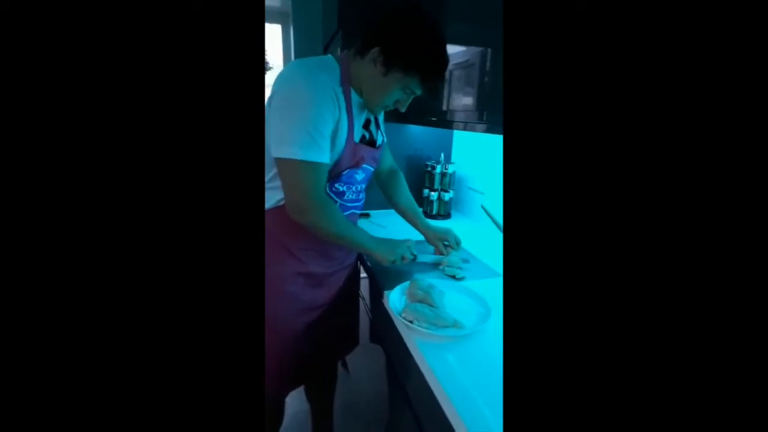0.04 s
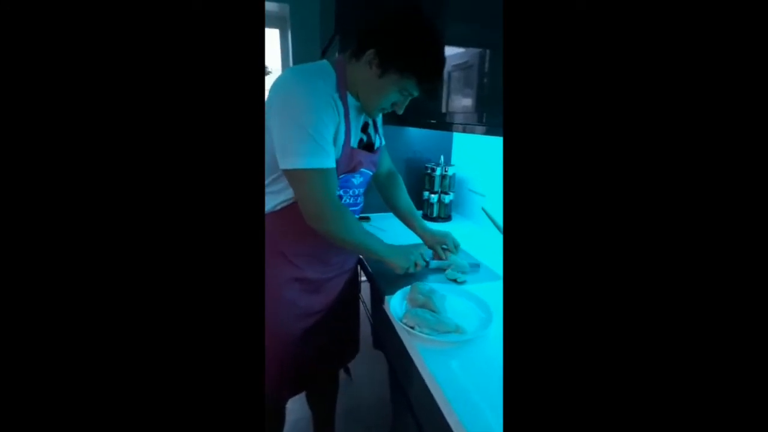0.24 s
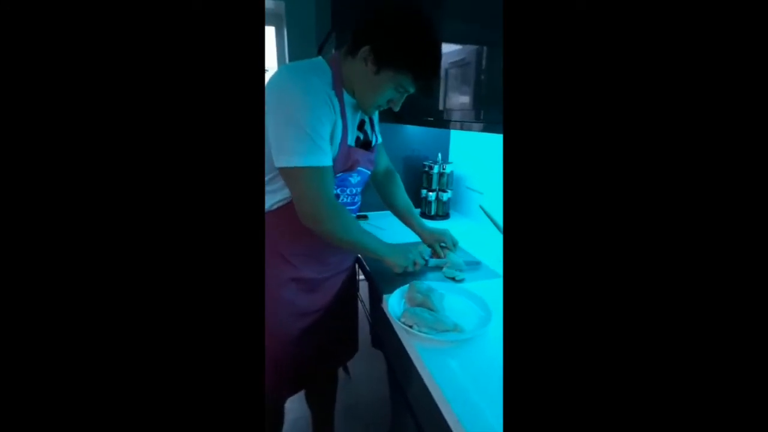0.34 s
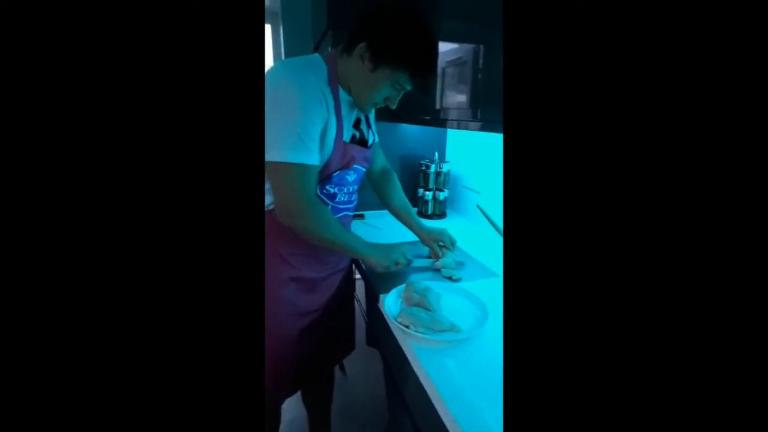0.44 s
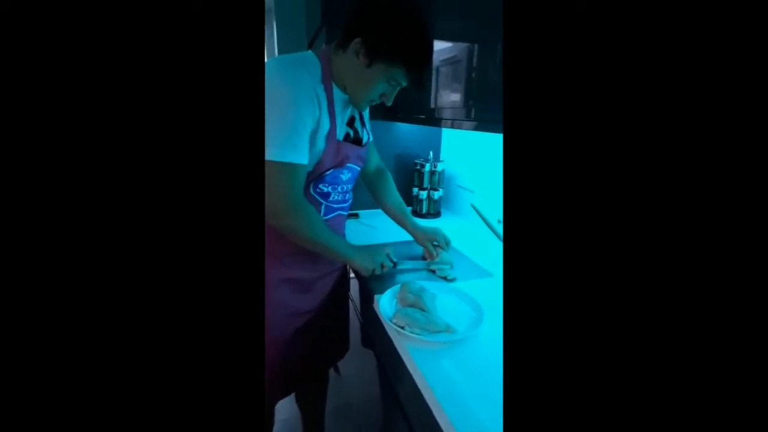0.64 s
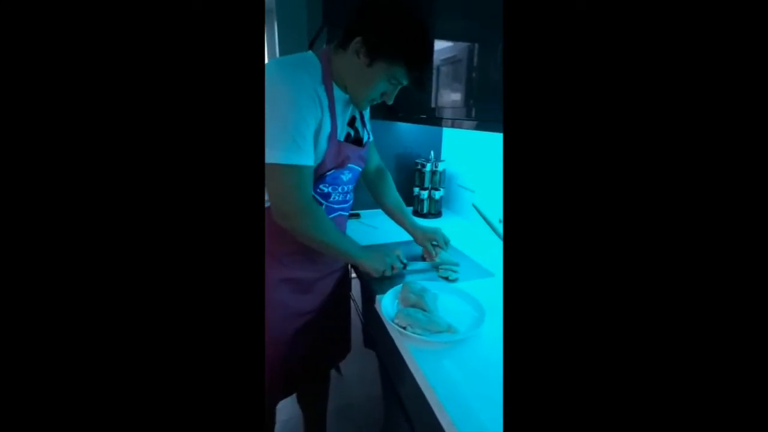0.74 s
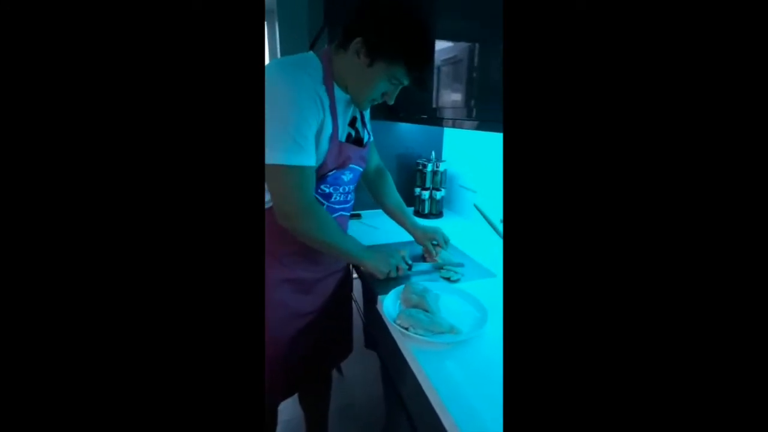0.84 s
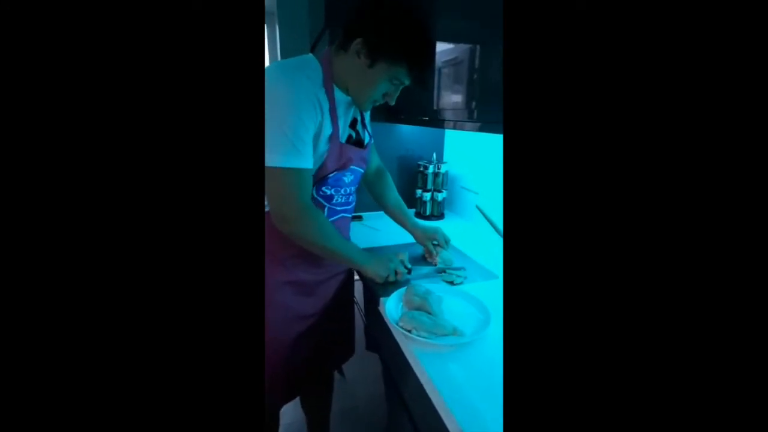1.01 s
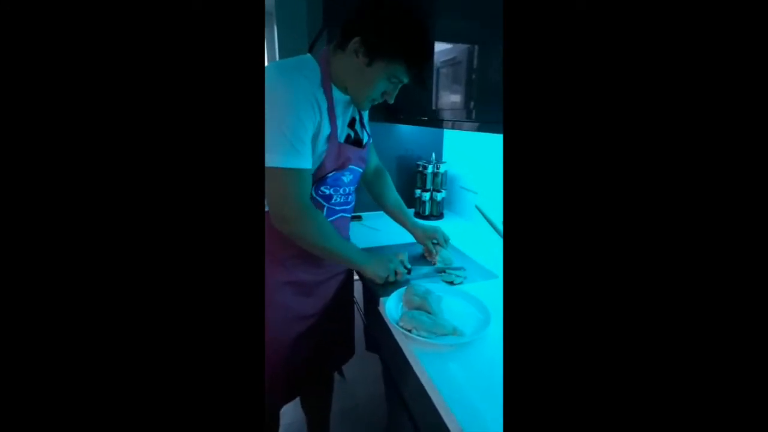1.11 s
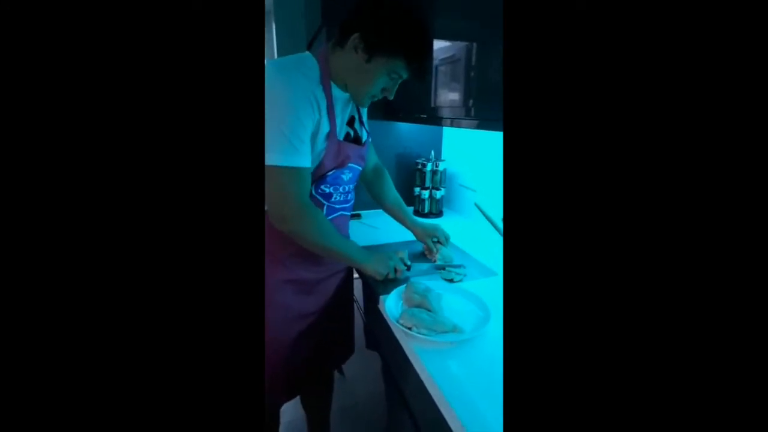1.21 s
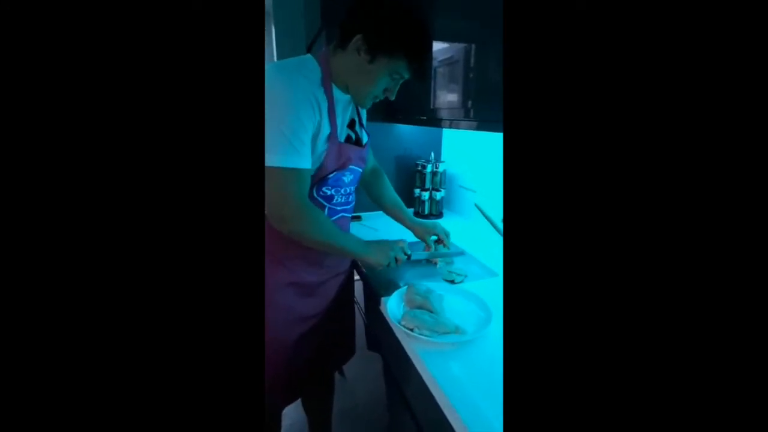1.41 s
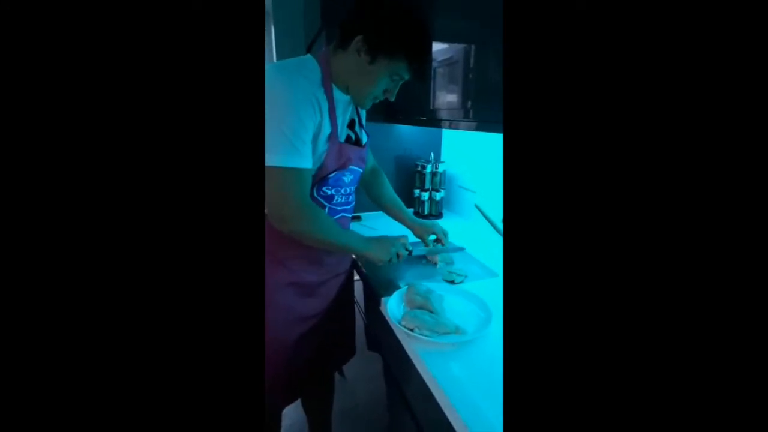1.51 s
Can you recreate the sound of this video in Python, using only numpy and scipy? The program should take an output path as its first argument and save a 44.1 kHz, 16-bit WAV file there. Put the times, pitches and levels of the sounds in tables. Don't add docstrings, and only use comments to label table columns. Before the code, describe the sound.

A knife cuts raw meat on a chopping board. An earlier blow's echo fades over low fridge hum; at 0.2 s comes a sharp knock with a dull worktop thud. Quieter sawing runs 0.34-0.55, a tiny squeak near 0.6, rough slicing chatter 0.66-0.8, a bright hard scrape 0.94-1.0, and a soft push around 1.15. Hard kitchen reverberation, then room tone with a very faint thin whine from 1.3.

```python
import sys
import numpy as np
from scipy import signal
from scipy.fft import rfft, irfft, next_fast_len
from scipy.io import wavfile
from scipy.ndimage import map_coordinates

SR = 44100
rng = np.random.default_rng(int(sys.argv[2]) if len(sys.argv) > 2 else 0)


def to_wav(sig):
    pcm = np.clip(np.atleast_2d(sig), -1, 1) * 32767
    pcm = np.round(pcm).astype(np.int16)
    wavfile.write(sys.argv[1], SR, pcm.T)


def boost(x):
    u = np.asarray(x, float) / 20
    return 10 ** u


N = 68355
TIME = np.arange(N) / SR
SPOTS = 3


def unit(x):
    return x / np.sqrt(np.mean(x ** 2) + 1e-20)


def along(points, hz):
    f, value = np.transpose(points)
    return np.interp(np.log(hz + 1), np.log(f + 1), value)


def wobble(rate):
    knots = rng.standard_normal(int(N * rate / SR) + 4)
    return map_coordinates(knots, [np.arange(N) * rate / SR])


def filtered(x, response):
    size = 2 * next_fast_len(N // 2 + SR // 4)
    hz = np.fft.rfftfreq(size, 1 / SR)
    return irfft(rfft(x, size) * response(hz), size)[..., :N]


def causal(gain):
    cepstrum = irfft(np.log(gain + 1e-6))
    half = len(cepstrum) // 2
    cepstrum[1:half] *= 2
    cepstrum[half + 1:] = 0
    return np.exp(rfft(cepstrum))


def paired(pair, spectrum):
    # f/Hz, correlation
    alike = [(60, 0.7), (250, 0.94), (600, 0.29), (2000, 0.14), (10000, .05)]

    def mid_and_side(hz):
        turn = np.arccos(np.clip(along(alike, hz), -1, 1)) / 2
        return boost(along(spectrum, hz)) * [np.cos(turn), np.sin(turn)]

    mid, side = filtered(pair, mid_and_side)
    return np.array([mid + side, mid - side])


def rush(spectrum):
    return unit(paired(rng.standard_normal((2, N)), spectrum))


def background():
    # f/Hz, level/dB rms, left over right/dB
    fridge = [
        (166.9, -65.5, -3.5),
        (409.8, -67, -0.5),
    ]
    # f/Hz, level/dB per Hz
    air_colour = [(25, -34.5), (100, -11.5), (170, -13), (450, -14), (1000, -28.5), (3000, -45),
                  (7300, -38.5), (11000, -35.5)]
    # t/s, level/dB
    air_drift = [(1.2, -2), (1.34, -1)]
    # f/Hz, level/dB per Hz
    echo_colour = [(88, -32), (150, -7.5), (600, -6.5), (1190, -17.5), (2350, -17.5), (3830, -24),
                   (7300, -25), (15900, -25.5)]
    # t/s, level/dB
    echo_fade = [(0, -1.5), (.06, -4), (.11, -11.5), (.14, -14.5), (.17, -12.5), (.2, -6), (.3, -32)]
    tones = 0
    for hz, db, pan_db in fridge:
        level_db = db + 0.5 + 1.8 * wobble(12) + pan_db * np.array([[.5], [-.5]])
        phase = 2 * np.pi * hz * TIME + .35 * wobble(6)
        tones = tones + boost(level_db) * np.sin(phase)
    air_db = -60.5 + np.interp(TIME, *np.transpose(air_drift)) + 1.2 * wobble(9.26)
    echo_db = -48 + np.interp(TIME, *np.transpose(echo_fade), right=-120)
    return boost(air_db) * rush(air_colour) + tones + boost(echo_db) * rush(echo_colour)


def worktop():
    # t/s, level/dB, f/Hz, t60/s
    thuds = [
        (-.012, -41.5, 98, 0.21),
        (.1865, -30.5, 93, 0.2),
        (0.199, -41, 122, 0.2),
        (0.376, -54.5, 100, 0.45),
    ]
    out = np.zeros(N)
    for start, db, hz, t60 in thuds:
        t = np.maximum(TIME - start, 0)
        rise = 1 - np.exp(-t / 0.022)
        out += boost(db - 60 * t / t60) * rise * np.sin(2 * np.pi * hz * t)
    return out * boost(0.74 * wobble(32))


def kitchen(x):
    # f/Hz, t60/s
    decay = [(200, 0.89), (1000, 0.58), (3000, 0.45), (8000, 0.47), (15000, 0.33)]
    hz, t, bins = signal.stft(rng.standard_normal((2, SR // 2)), SR, nperseg=128)
    bins = bins * boost(-60 * t / along(decay, hz)[:, None])
    tail = signal.istft(bins, SR, nperseg=128)[1]
    tail = tail / np.linalg.norm(tail[0])
    delayed = np.pad(x, (40, 0))
    return signal.fftconvolve(delayed[None], tail, axes=1)[:, :N]


def early(spots):
    t = np.arange(SR // 10) / SR
    t60 = 0.07
    tails = rng.standard_normal((SPOTS, 2, len(t))) * boost(-60 * t / t60)
    tails = tails / np.linalg.norm(tails, axis=2, keepdims=True)
    return signal.fftconvolve(spots[:, None], tails, axes=2)[..., :N].sum(0)


def heard(spots, room_db):
    early_db, lag_s = 5.5, 0.00008
    dry = spots.sum(0)
    ears = np.array([[1], [-1]])
    near = filtered(dry, lambda f: np.exp(-1j * np.pi * f * lag_s * ears))
    echoes = boost(early_db) * early(spots) + boost(room_db + 4.5) * kitchen(dry)
    return boost(-9.5) * (near + paired(echoes, [(1, 0.022)]))


def stroke(pressure, blows, colour, rings, grip):
    rate, scatter_db, ring_db, room_db = grip
    draw = rng.random((2, N))
    biggest_slip = .04
    sizes = boost(-scatter_db * np.log(draw[1] + biggest_slip))
    slips = (draw[0] < rate / SR) * sizes * np.sign(rng.standard_normal(N))
    slips = unit(slips) + 0.42 * rng.standard_normal(N)
    s, db = np.transpose(pressure)
    slips = slips * boost(np.interp(TIME, s, db, -120, -120) + 1.2 * wobble(69.93))
    for at, blow_db in blows:
        slips[round(at * SR)] += boost(blow_db)

    def body(f):
        ring = 0
        for centre, width, mode_db in rings:
            peak = boost(2 * (mode_db + ring_db + 9.0))
            ring = ring + peak / (1 + (2.2 * (f - centre) / width) ** 2) ** 2
        power = boost(2 * along(colour, f)) + ring * np.clip(f / 300, 0, 1) ** 2
        return causal(np.sqrt(power / np.mean(power)))

    spots = slips * (rng.integers(SPOTS, size=N) == np.arange(SPOTS)[:, None])
    return heard(filtered(spots, body), room_db)


def blade():
    # t/s, level/dB
    knock = [(0.2085, -66), (0.2093, -22), (0.214, -29), (0.236, -30), (.25, -37.5), (0.292, -37.5),
             (0.311, -67.5)]
    saw = [(0.336, -47.5), (0.347, -38.5), (.39, -38), (0.4, -33), (0.439, -39), (.5, -39), (0.549, -43),
           (0.557, -83.5)]
    slicing = [(0.592, -49.5), (.62, -45), (0.663, -35), (0.664, -27.5), (.69, -28), (.72, -28.5),
               (0.745, -33.5), (.749, -40), (.81, -48), (.83, -55.5)]
    scrape = [(0.925, -58.5), (0.939, -36.5), (0.947, -21.5), (0.955, -21.5), (0.97, -24.5), (0.983, -24.5),
              (0.995, -34), (1.085, -48.5), (1.1, -83)]
    push = [(1.1, -48), (1.143, -49), (1.152, -38), (1.175, -37.5), (1.19, -41.5), (1.199, -44),
            (1.25, -51), (1.301, -76)]
    # t/s, level/dB
    blows = [
        [(0.2098, -2), (.2125, -9), (.2215, -2.5), (.2295, -3.5)],
        [(.345, -24), (.398, -9.5), (.468, -17.5), (.497, -9)],
        [(.6635, -7), (.670, -1), (.682, -4), (.689, -9.5), (.6995, -12.5), (.72, -10), (.7285, -15.5),
         (.745, -15), (.774, -16.5)],
        [(.9405, -14), (.9475, -7.5), (.9548, -2), (.9595, -10), (.9655, -8), (.971, -4.5), (.9805, 0),
         (.9838, -2), (.9915, -8)],
        [(1.15, -24), (1.178, -38)],
    ]
    # f/Hz, level/dB per Hz
    colours = [
        [(150, -24), (400, -11.5), (800, -9), (1400, -4.5), (2800, -9), (4200, -19.5), (7500, -24.5),
         (15900, -24)],
        [(150, -24), (350, -24.5), (700, -8), (1500, -2.5), (2900, -3.5), (4500, -10), (7500, -16.5),
         (15900, -14)],
        [(300, -54.5), (430, -32.5), (540, -5.5), (1300, 0.5), (2800, 1.5), (4300, -6.5), (7500, -11),
         (15900, -19)],
        [(150, -39.5), (700, -16.5), (1050, -10), (1800, -3), (3600, -2.5), (5000, -11.5), (7500, -15),
         (15900, -18.5)],
        [(150, -25.5), (350, -3.5), (600, 0.5), (1100, -3), (1800, -7), (3500, -8.5), (7500, -23),
         (15900, -33.5)],
    ]
    # f/Hz, width/Hz, level/dB
    rings = [
        [(1080, 94, -7.5), (1230, 35, -10), (1510, 50, -5.5), (1640, 35, -3), (2250, 50, -9), (2726, 60, -4.5)],
        [(657, 70, -9.5), (1403, 50, -9), (1870, 80, -4), (2180, 35, -7), (2250, 35, -12.5), (2895, 55, -3.5),
         (3470, 110, -11)],
        [(559, 130, -10), (720, 50, -5), (1056, 24, 4), (1361, 16, -2), (1614, 64, -5.5), (2250, 59, -4),
         (2500, 35, 2.5), (2600, 73, -5), (2823, 56, -0.5), (2890, 45, -0.5), (3550, 270, -4.5)],
        [(1420, 54, -8), (1600, 25, -9.5), (1890, 35, -3), (2190, 40, -11.5), (2430, 45, -2), (2970, 31, -8),
         (3270, 35, -2), (3390, 42, -6), (4570, 40, -5), (4845, 40, -3.5), (5220, 67, -10.5),
         (5790, 300, -23.5)],
        [(554, 60, -5), (1007, 61, -5.5), (1210, 45, -7), (1385, 45, -8.5), (1920, 48, -8), (2660, 50, -11)],
    ]
    grips = [
        (6040, 4, -4, -3),
        (2470, 4.5, -1.5, 0.5),
        (2460, 4, -2, -1.5),
        (2350, 4, -1.5, -2.5),
        (2110, 4.5, 4, -15),
    ]
    pressures = [knock, saw, slicing, scrape, push]
    return sum(stroke(*contact) for contact in zip(pressures, blows, colours, rings, grips))


def pings():
    # t/s, f/Hz, t60/s
    modes = [
        (.9755, 3700, .06),
        (.948, 1890, .12),
        (.2105, 1240, .1),
        (.2105, 1495, .1),
        (.462, 1200, .12),
        (.465, 1860, .12),
        (.49, 1860, .08),
        (.396, 1150, .06),
        (.345, 2700, .1),
    ]
    mode_db = [-13, -24.5, -55, -30, -32.5, -39.5, -45, -40, -38]
    out = np.zeros((SPOTS, N))
    for k, ((start, hz, t60), db) in enumerate(zip(modes, mode_db)):
        t = np.maximum(TIME - start, 0)
        rise = 1 - np.exp(-t / .002)
        out[k % SPOTS] += boost(db - 60 * t / t60) * rise * np.sin(2 * np.pi * hz * t)
    return heard(out, -14)


def shuffle():
    # t/s, level/dB
    rocking = [(.3, -67), (.45, -57), (.55, -63), (.62, -51.5), (.67, -61), (.73, -67), (.77, -52),
               (.84, -60.5), (.9, -63), (1.1, -66.5), (1.25, -63.5)]
    # f/Hz, level/dB per Hz
    rocking_colour = [(120, -48.5), (220, -4), (350, -2), (600, -2), (1200, -31)]
    squeak_note = (0.608, 0.668, 1140, -47.5)
    start, end, hz, squeak_db = squeak_note
    swell = np.sin(np.pi * np.clip((TIME - start) / (end - start), 0, 1)) ** 0.45
    phase = 2 * np.pi * hz * TIME + 0.6 * wobble(60)
    tone = np.sin(phase) + boost(-8) * np.sin(2 * phase)
    squeak = boost(squeak_db + 1.8 * wobble(40)) * swell * tone
    s, db = np.transpose(rocking)
    rocking_db = np.interp(TIME, s, db, -120, -120) + 3 * wobble(25.35)
    return boost(rocking_db) * rush(rocking_colour) + squeak + kitchen(squeak)


def whine():
    tone_hz = [3404, 3740]
    # level/dB rms, unsteadiness/dB, phase wander/rad
    tone_sway = [
        (-71, 0.5, 0.27),
        (-80, 5.5, 1.4),
    ]
    # f/Hz, level/dB per Hz
    hiss_colour = [(2500, -14), (3000, -5), (3400, -12), (3800, -4), (4200, -25), (5000, -60)]
    start_s, rise_s, hiss_db = 1.325, .08, -80
    rise = np.clip((TIME - start_s) / rise_s, 0, 1)
    tones = 0
    for hz, (db, sway_db, wander) in zip(tone_hz, tone_sway):
        level = boost(db + sway_db * wobble(24.23))
        phase = 2 * np.pi * hz * TIME + [[0], [1.3]] + wander * wobble(40)
        tones = tones + level * np.sin(phase)
    return rise * (tones + boost(hiss_db) * rush(hiss_colour)) * boost([[-3], [3]])


def scene():
    return background() + worktop() + blade() + pings() + shuffle() + whine()


def band_limit(x):
    return signal.sosfilt(signal.butter(12, 16110, fs=SR, output="sos"), x)


def record(dry):
    # f/Hz, gain/dB
    mic = [(25, -15), (70, 3), (6500, 0), (7500, 4), (8100, -2.5), (8600, -9), (10000, -7.5), (15900, -4)]
    top_hz = 16000
    mix = filtered(dry, lambda hz: boost(along(mic, hz)) * (hz < top_hz))
    return band_limit(mix)


dry = scene()
out = record(dry)
to_wav(out)
```